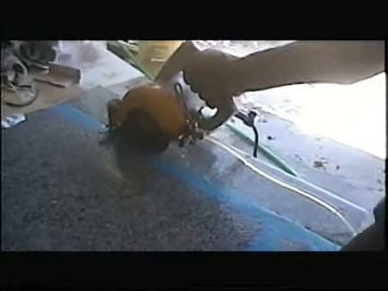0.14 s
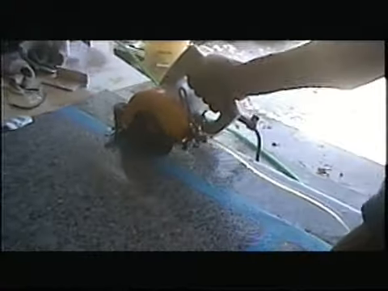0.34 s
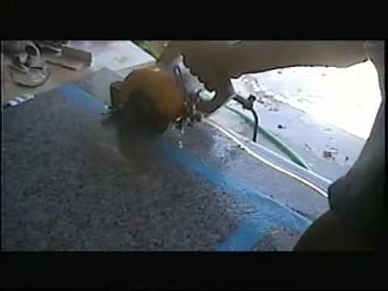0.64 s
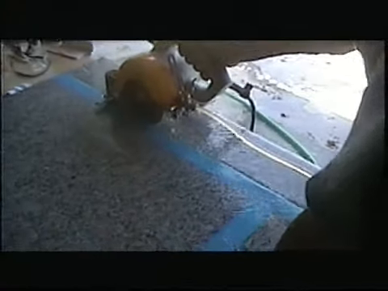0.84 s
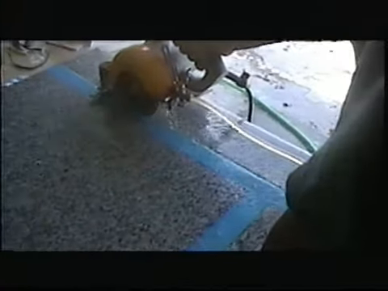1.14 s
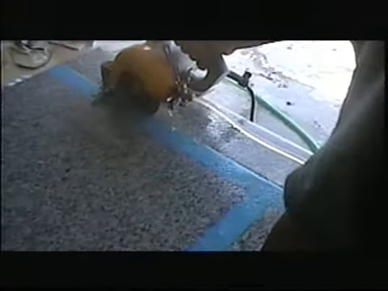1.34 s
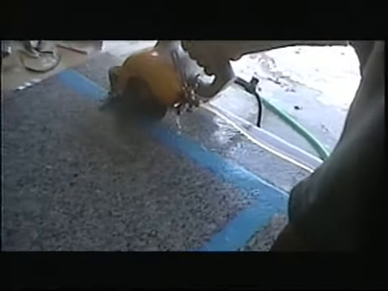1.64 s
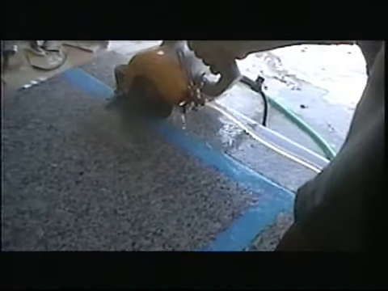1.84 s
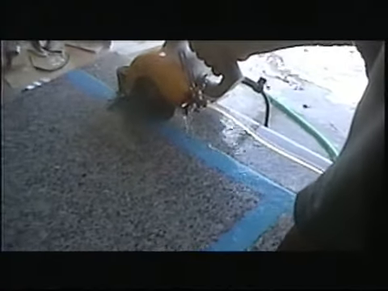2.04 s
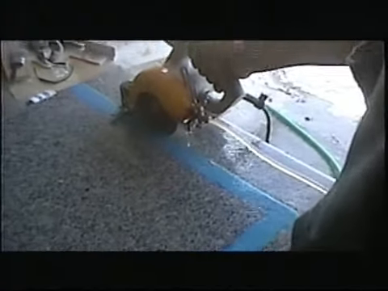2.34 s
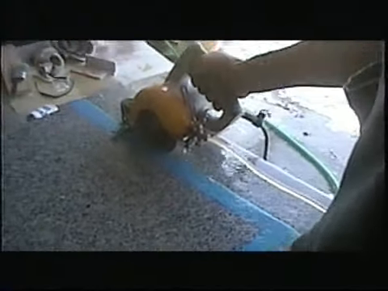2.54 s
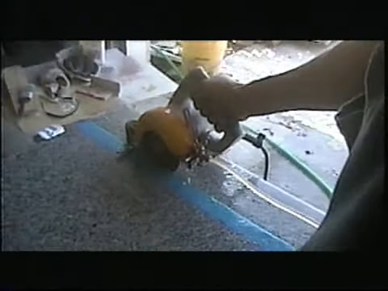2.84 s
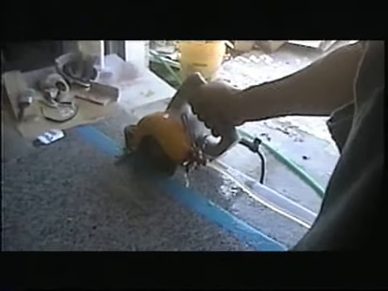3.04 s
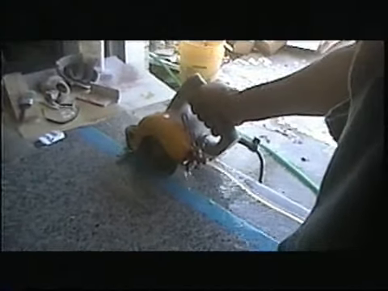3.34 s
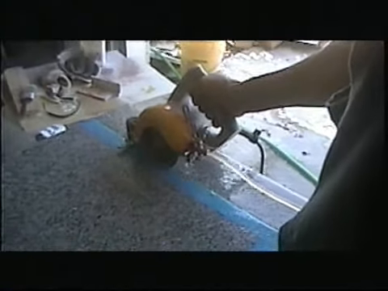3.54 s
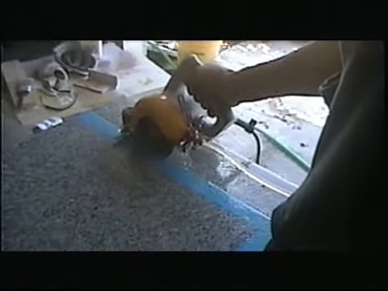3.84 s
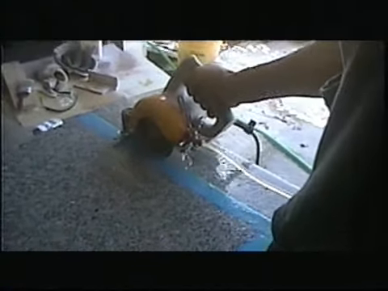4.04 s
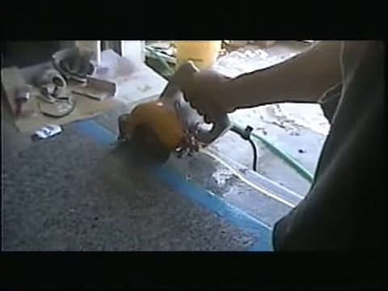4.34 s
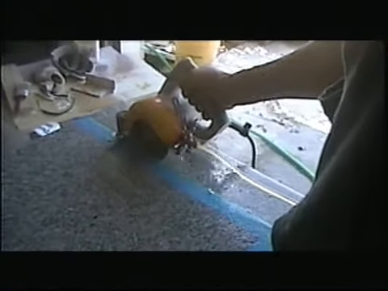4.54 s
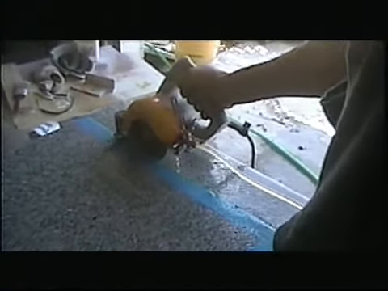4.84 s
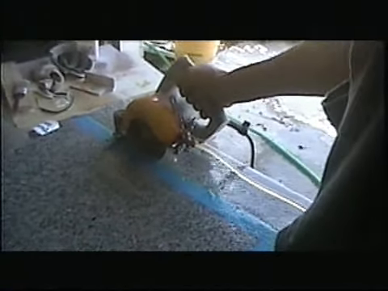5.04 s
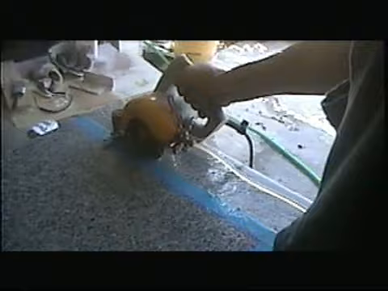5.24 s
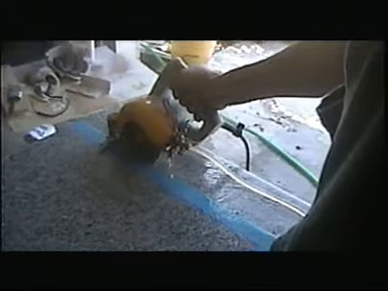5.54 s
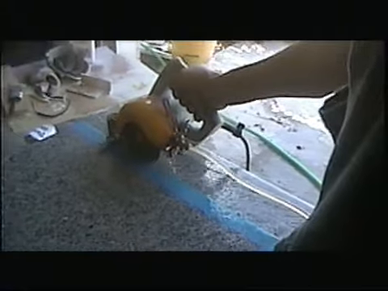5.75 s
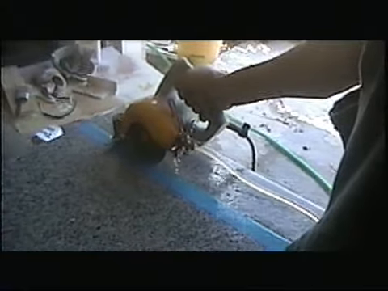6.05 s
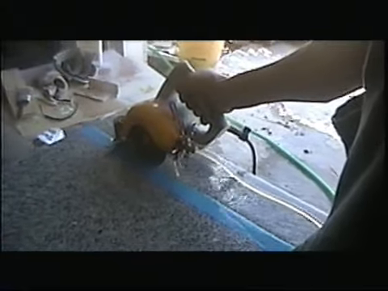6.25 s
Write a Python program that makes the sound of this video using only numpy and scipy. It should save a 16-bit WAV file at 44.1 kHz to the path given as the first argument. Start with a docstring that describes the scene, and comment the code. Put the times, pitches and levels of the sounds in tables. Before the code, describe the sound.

A handheld wet saw is already cutting a stone slab at the start and keeps going for about six and a half seconds, heard almost entirely on the left. The main sound is a bright, buzzing grind with a metallic ring from the steel disc, mixed with the hiss of water and slurry. Beneath it runs a motor and gear whine with a slight rattle. Thin, shrill squeals overlap throughout, swelling and fading at different pitches as the blade binds, and the grinding briefly dips now and then. The pitch rises a little to its peak just after 2 seconds, then sags under load until about 4.3 seconds. After that the saw gradually picks up speed, and from about 5.3 seconds the straining gears sing more strongly. It is still cutting at the end.

```python
"""A handheld wet saw cuts granite for 6.4 seconds, heard on the left. From the start its diamond rim
meets the stone in nearly the same way on every turn, so the grinding buzzes and rings the steel disc.
Water and slurry hiss, the drive whines, and the blade squeals wherever it binds. It spins fastest
just after 2 s, sags under load until about 4.3 s, then picks up again as the gears strain and sing."""
import sys
import numpy as np
from scipy import signal
from scipy.fft import rfft, irfft
from scipy.io import wavfile
from scipy.ndimage import uniform_filter1d, map_coordinates

SR = 44100
rng = np.random.default_rng(int(sys.argv[2]) if len(sys.argv) > 2 else 0)


def unload_audio(sound):
    """Save the sound as a 16-bit wav file, at the path given as the first command line argument."""
    columns = np.transpose(np.atleast_2d(sound))
    # keep every value between -1 and 1, then stretch to whole-number steps
    steps = np.round(np.clip(columns, -1, 1) * 32767)
    wavfile.write(sys.argv[1], SR, steps.astype(np.int16))


N = 282681
T = np.arange(N) / SR
HZ = np.fft.rfftfreq(N, 1 / SR)

# Levels in the tables are relative. A "multiple" is a frequency divided by the blade's turns a second.
# tone colour of the workshop's background: f/Hz, level/dB
ROOM_COLOUR = [(20, -7), (55, 3), (95, -7.5), (130, 2.5), (200, -7), (400, -1.5), (2000, -47)]
# how fast the blade spins: t/s, speed/(turns a second)
BLADE_SPEED = [(0.02, 132.31), (0.15, 132.01), (0.27, 130.73), (0.37, 131.62), (0.42, 131.54),
               (0.75, 135.19), (1.08, 134.3), (1.19, 132.72), (1.34, 133.45), (1.4, 133.15), (1.57, 134.24),
               (1.77, 136.67), (1.9, 139.03), (1.99, 139.48), (2.03, 140.46), (2.22, 140.57),
               (2.42, 138.39), (2.55, 136.12), (2.61, 135.63), (2.68, 133.93), (2.79, 132.97),
               (2.89, 131.38), (3.04, 130.44), (3.32, 126.74), (3.38, 127.01), (3.47, 125.64),
               (3.74, 124.42), (3.83, 123.01), (4.12, 124.01), (4.22, 122.58), (4.39, 122.69),
               (4.71, 126.22), (4.8, 126.17), (4.9, 127.28), (4.95, 126.7), (5.07, 127.88), (5.31, 126.43),
               (5.47, 128.19), (5.53, 127.69), (5.65, 129.0), (5.79, 128.92), (5.96, 129.88), (6.03, 130.9),
               (6.08, 129.95), (6.19, 130.93), (6.39, 130.06)]
# thin tones of the motor shaft: multiple
SHAFT_MULTIPLES = [25.3, 33.72]
# the drive rattles under light load and sings under strain: t/s, rattle factor, strain/dB
DRIVE_LOAD = [(0, 0.49, -3), (.85, 1.7, -1), (1.3, 2.1, -31), (2.1, 3.1, -22), (2.6, 2.5, -3),
              (3, 1.43, -19), (4.2, 0.62, -12), (4.9, 1.05, -10), (5.5, 0.8, 16), (6.41, 0.92, 0)]
# the gear case's own ring: f/Hz, width/Hz, level/dB
CASE_RING = [(930, 105, 0)]
# side tones of the motor's pulsing pull: multiple, pulse rates added to it, level/dB
SIDE_TONES = [(3, -1, -82), (2, 1, -79.5), (8, -1, -83)]
# the four tones of the gears: multiple
GEAR_MULTIPLES = [7, 8, 14, 15]
# how the gears swell under load: t/s, then level/dB of each of the four tones
GEAR_LEVELS = [(0.0, -58, -53.5, -55, -64), (0.29, -51.5, -62, -62, -80), (0.6, -55.5, -64, -57, -75),
               (0.9, -53, -63, -57, -74), (1.23, -59.5, -62, -59, -70), (1.66, -58, -70, -64, -80),
               (1.92, -67, -61, -54.5, -72), (2.11, -67, -72, -80, -82), (2.35, -62, -76, -63, -74),
               (2.65, -58, -65, -53, -76), (2.78, -60, -63.5, -62, -76), (3.1, -54.5, -55, -72, -68.0),
               (3.24, -64, -64, -76, -64), (3.47, -66, -72, -75, -57), (3.87, -71, -62.5, -79, -63),
               (4.28, -76, -54, -84, -56.5), (4.46, -75, -62.5, -70, -62), (4.61, -73, -55.5, -53.5, -61),
               (4.8, -62, -66, -68, -75), (5.24, -63.5, -54.5, -56, -66), (5.42, -70, -56.5, -54.5, -58),
               (5.8, -61, -55.5, -58, -49.5), (5.94, -53.5, -52, -52, -51), (6.08, -50.5, -54, -61, -50.5),
               (6.39, -53, -57.5, -54, -52)]
# pitches that the housing makes louder: f/Hz, width/Hz, level/dB
HOUSING_RINGS = [(255.1, 27.5, -68), (374, 22, -59), (398.5, 4.9, -67), (420.2, 7.5, -61.5),
                 (1342, 28, -65), (1430, 80, -62), (2432, 120, -63)]
# tones of the drive: multiple, level/dB, roughness before the rattle factor, share of the strain
DRIVE_TONES = [(2, 0.4, 0.09, 0.03), (3, -0.5, 0.09, 0.03), (10, 2, 0.17, 0.6), (11, -0.5, 0.25, 0.23),
               (19, -2, 0.76, 0.34)]
# the rim briefly bites harder (+) or loses its grip (-): t/s, length/s, change/dB
BITE_JOLTS = [(0.078, 0.11, -4), (0.18, 0.033, 3), (0.308, 0.049, -4), (0.35, 0.034, -2.5),
              (0.631, 0.019, 6), (0.707, 0.056, 2.5), (1.056, 0.049, -4.5), (1.794, 0.095, 1.5),
              (1.915, 0.025, -9.5), (2.115, 0.15, 2), (2.62, 0.052, -4.5), (2.69, .05, -2),
              (2.838, 0.025, -7), (3.082, 0.033, -9), (3.168, 0.034, -5), (3.205, 0.053, -4.5),
              (3.746, 0.062, 2.5), (4.132, .05, -2.5), (4.23, 0.17, 0), (4.458, 0.09, -3),
              (4.82, 0.053, -3.5), (5.26, 0.071, 3), (5.506, 0.024, -5)]
# narrow pitches at which the disc sings: f/Hz, width/Hz, level/dB
SINGING_RINGS = [(2890, 24, -64), (2880, 86, -69), (3480, 16, -70), (4030, 47, -72), (4470, 380, -68),
                 (5815, 37, -67), (6680, 20, -57), (7550, 40, -55)]
# the blade binds in its slot and squeals: start/s, end/s, multiple, level/dB
BINDS = [(-.1, .62, 34, -57.5), (-.05, .325, 35, -54), (-.1, .4, 30, -58.5), (-.05, .7, 21, -58),
         (-.05, 0.445, 57, -57), (.42, .628, 25, -55), (.42, .7, 44, -62), (.53, .76, 24, -65),
         (.55, .85, 29, -57.5), (.6, .98, 28, -60), (.6, 1.06, 34, -58.5), (.6, .85, 56, -57),
         (1.05, 1.952, 34, -54.5), (1.11, 1.9, 22, -56), (1.95, 2.62, 22, -58), (1.0, 1.8, 30, -58),
         (1.18, 1.52, 64, -58), (1.4, 1.82, 29, -52), (1.63, 2.3, 33, -55.5), (1.66, 1.87, 62, -52.5),
         (1.95, 2.42, 25, -58), (1.98, 2.483, 27, -55), (2.203, 2.43, 26, -56), (2.32, 2.5, 55, -58),
         (2.38, 2.82, 34, -58), (2.42, 2.577, 62, -54.5), (2.7, 3.05, 22, -58), (2.76, 3, 31, -55),
         (2.82, 3.257, 23, -54.5), (2.88, 3.2, 27, -52.5), (3.22, 3.52, 52, -60), (3.27, 3.86, 36, -51),
         (3.27, 3.92, 32, -54.5), (3.25, 3.8, 30, -55.5), (3.6, 4.02, 37, -55), (3.85, 4.2, 36, -56.5),
         (3.872, 4.16, 27, -55), (3.88, 4.417, 24, -57.5), (4.08, 4.65, 37, -56.5), (4.16, 4.506, 23, -57),
         (4.2, 4.48, 33, -56.5), (4.35, 4.75, 53, -59), (4.533, 4.86, 30, -55.5), (4.56, 4.87, 22, -54.5),
         (4.823, 5.142, 30, -51), (5.12, 5.4, 30, -58), (5.5, 6.2, 30, -57.5), (4.883, 5.176, 35, -55),
         (4.88, 5.45, 52, -58.5), (5.0, 5.35, 46, -60.5), (5.13, 5.36, 27, -54.5), (5.2, 5.55, 36, -57),
         (5.322, 5.92, 23, -53.5), (5.5, 5.97, 35, -56), (5.55, 5.85, 58, -60), (5.75, 6.15, 51, -61),
         (5.95, 6.5, 34, -57), (6.0, 6.3, 58, -58), (6.03, 6.5, 50, -58.5), (6.17, 6.55, 45, -59),
         (6.203, 6.55, 35, -57)]
# how much of the grinding repeats from turn to turn: f/Hz, share of the power (0-1)
REPEAT_SHARE = [(500, 0.29), (950, 0.46), (1300, 0.66), (1850, 0.58), (2400, 0.58), (3500, 0.76),
                (4600, 0.75), (6000, 0.52), (8500, 0.8), (12000, 0.8), (15000, 0.1)]
# broad tone colour of rim on stone: f/Hz, level/dB
GRIT_COLOUR = [(190, -27), (310, -12), (450, -10), (550, 0.5), (1250, -8), (2300, 0.5), (3400, 6.5),
               (4200, 1), (5400, -1), (7100, -5.5), (8800, -3.5), (9150, -4), (9600, 1), (10400, 4.5),
               (12500, -2.5), (14600, -12.5)]
# rings (+) of the disc and its guard, and hollows (-) between them: f/Hz, width/Hz, lift/dB
DISC_RINGS = [(1075, 370, 9), (1440, 240, 6.5), (1892, 240, 5), (3290, 41, -3.5), (3956, 980, 7),
              (4340, 110, -6), (4567, 280, 11.5), (5905, 390, 9), (6554, 550, 11.5), (7600, 750, 9),
              (8454, 200, 12.5), (9710, 180, 8), (10780, 300, 2.5), (11400, 250, 3.5), (12400, 230, 7),
              (13100, 250, 6.5)]
# borders between seven bands (roar, grinding, main ring, three high rings, spray): f/Hz
BAND_BORDERS = [2400, 4300, 5200, 7050, 8000, 9100]
# slow course of the cut: t/s, then level/dB of the slab's roar, the grinding, the spray
CUT_LEVELS = [(0.0, -53.5, -50, -51), (0.35, -53.5, -50, -51), (0.5, -52, -48, -49), (0.7, -52.5, -48, -53),
              (1.0, -52.5, -48.5, -52), (1.5, -53, -47, -50.0), (1.8, -54.5, -50, -53),
              (1.9, -54, -47.5, -52.5), (2.35, -51.5, -48, -53.5), (2.65, -53.5, -49, -51),
              (2.8, -53, -46.5, -51.0), (2.9, -54.5, -49.5, -53.5), (3.15, -55, -48, -53),
              (3.3, -53.5, -46, -52), (3.51, -54, -49.5, -52), (3.61, -55.5, -50.5, -53.5),
              (3.81, -55, -49, -51), (4.25, -54.5, -47.5, -50), (4.61, -56.5, -50, -51.5),
              (4.91, -53.5, -47, -50), (5.01, -53, -49, -52), (6.41, -54, -49, -50.5)]
# the disc's main ring near 4.5 kHz: t/s, level/dB
MAIN_RING_LEVELS = [(0, -56), (.19, -47), (.33, -52), (1.0, -52), (1.6, -52.5), (2.35, -54.5), (2.45, -54),
                    (2.7, -52), (2.85, -55), (3.25, -53.5), (3.7, -53.5), (4.2, -52), (4.55, -53),
                    (4.8, -53.5), (4.93, -54), (5.2, -54), (5.29, -51), (5.5, -52), (6.41, -53.5)]
# the disc's high rings: t/s, then level/dB near 6 kHz, 7.6 kHz, 8.5 kHz
HIGH_RING_LEVELS = [(0.0, -58.7, -51.5, -54), (0.69, -54, -56, -52), (1.03, -56.5, -56, -54.5),
                    (1.29, -53, -55.5, -48), (1.77, -56.5, -55.7, -52), (1.93, -56.5, -58.5, -53),
                    (2.23, -54, -59, -52), (2.4, -55, -55, -51), (2.64, -56, -56.5, -53),
                    (2.8, -56.5, -55, -50.5), (3.06, -56, -62, -53.5), (3.44, -57.5, -56, -53),
                    (3.61, -57, -57.7, -55), (4.21, -54, -53.5, -49.5), (4.42, -55, -52.5, -52),
                    (4.88, -53.5, -56.0, -51), (5.18, -54.5, -53, -53), (5.47, -54.5, -55, -53),
                    (5.73, -54, -52.5, -49.5), (6.41, -53.5, -57, -54)]


def amp(db):
    """Turns decibels into a factor to multiply by."""
    return 10 ** (np.asarray(db) / 20)


def unit(x):
    """Scales a signal to an average strength (rms) of one."""
    return x / np.sqrt(np.mean(x ** 2) + 1e-20)


def curves(rows):
    """Joins the points of a table into one curve over time for each column."""
    times, *columns = np.transpose(rows)
    return [np.interp(T, times, column) for column in columns]


def across(points):
    """Reads a table of (f/Hz, value) at every frequency."""
    hz, value = np.transpose(points)
    return np.interp(np.log(HZ + 1), np.log(hz), value)


def resonances(rings):
    """How strongly a ringing part answers at every frequency."""
    return sum(amp(db) / (1 + (2 * (HZ - hz) / width) ** 2) for hz, width, db in rings)


def noise(gains):
    """Noise of strength one, coloured by a gain for every frequency."""
    return unit(irfft(rfft(rng.standard_normal(N)) * gains, N))


def wander(rate_hz, step=64):
    """A smooth random wobble of strength one, mostly slower than the given rate."""
    times = T[::step]
    hz = np.fft.rfftfreq(len(times), step / SR)
    slow = rfft(rng.standard_normal(len(times))) / np.sqrt(1 + (hz / rate_hz) ** 4)
    return np.interp(T, times, unit(irfft(slow, len(times))))


def shaking(rough, rates_hz):
    """The cut shakes a tone: the real part wobbles its level, the imaginary part its timing."""
    wobble = wander(rates_hz[0]) + 1j * wander(rates_hz[1])
    return (1 + rough * wobble) / np.sqrt(.5 + rough ** 2)


def tone(turns, multiple, rough, shake_hz=(17, 30)):
    """A shaken tone of strength one that follows the spinning blade."""
    return (shaking(rough, shake_hz) * np.exp(2j * np.pi * (multiple * turns + rng.random()))).real


def rumble(level_db=-87):
    """The workshop rumbles faintly in the background."""
    return amp(level_db) * noise(amp(across(ROOM_COLOUR)))


def beating(turns, pulse_hz=120):
    """The motor's pull pulses twice a mains cycle, adding faint side tones that beat with the whine."""
    return sum(amp(db) * tone(multiple * turns + side * pulse_hz * T, 0.98, rough=0.055)  # 2 % flat
               for multiple, side, db in SIDE_TONES)


def chatter(rattle, level_db=-72):
    """Loose gear teeth knock the case, which gives a rough ring at its own pitch."""
    return amp(level_db) * rattle * noise(resonances(CASE_RING))


def motor_shaft(turns, level_db=-68):
    """The fast motor shaft adds thin tones between the blade's whole multiples."""
    return amp(level_db) * sum(tone(turns, multiple, rough=0.46) for multiple in SHAFT_MULTIPLES)


def gears(turns, rattle):
    """The gears swell under load and rattle when it is light; the upper two tones flutter most."""
    trims_db, roughness, shakes_hz = (-.8, -1.3, -1.8, -2.3), (.25, .25, .38, .42), (22, 22, 34, 34)
    tones = zip(GEAR_MULTIPLES, curves(GEAR_LEVELS), trims_db, roughness, shakes_hz)
    return sum(amp(db + trim) * tone(turns, multiple, rough * rattle, (hz, 1.2 * hz))
               for multiple, db, trim, rough, hz in tones)


def whine(speed, turns, rattle, strain_db):
    """The drive hums and whines; each tone swells as it glides into a ring of the housing."""
    housing = resonances(HOUSING_RINGS)
    out = np.zeros(N)
    for multiple, db, rough, share in DRIVE_TONES:
        gain = np.interp(multiple * speed, HZ, housing) * amp(db + share * strain_db)
        out += gain * tone(turns, multiple, rough * rattle)
    return out


def bite(unsteady_db=0.27):
    """Quick changes in the force of the cut, in dB: single jolts on top of an unsteady hand."""
    jolts = sum(db * np.cos(np.pi * np.clip((T - middle) / length, -.5, .5)) ** 2
                for middle, length, db in BITE_JOLTS)
    return jolts + unsteady_db * wander(rate_hz=19)


def rim(turns, memory_turns, evenness, points=512, turn_count=920):
    """The bumps around the rim come back on every turn while they slowly wear into new ones."""
    kept = np.exp(-1 / memory_turns)
    fresh = rng.standard_normal((turn_count, points))  # one row for each turn
    worn = signal.lfilter([np.sqrt(1 - kept ** 2)], [1, -kept], fresh, axis=0, zi=kept * fresh[-1:])[0]
    multiples = rfft(worn)
    bumps = irfft(multiples / (abs(multiples) + 1e-9) ** evenness)  # evens out their strengths
    return unit(map_coordinates(bumps.ravel(), [turns * points], order=3, mode="wrap"))


def singing(turns, gain_db=-3, buzz=0.24, points=512):
    """Long-lasting rim bumps make the disc sing whenever a multiple drifts into a narrow ring."""
    bumps = rim(turns, memory_turns=49, evenness=0.71, points=points)
    bumps *= np.sqrt(points / 2)  # each multiple at a strength of about one
    kicks = 1 + buzz * np.cos(2 * np.pi * turns)  # struck anew on every turn
    return amp(gain_db) * kicks * irfft(rfft(bumps) * resonances(SINGING_RINGS), N)


def squeals(turns, rubbing, gain_db=0.5, flatness=2.45, buzz=0.29, window=3500):
    """The blade binds: a squeal takes over one multiple of the rubbing, swells, holds and fades."""
    out = np.zeros(N)
    shake = shaking(rough=0.23, rates_hz=(13, 47))
    for start, end, multiple, db in BINDS:
        now = (T > start) & (T < end)
        arch = np.sin(np.pi * (T[now] - start) / (end - start))
        swell = np.tanh(flatness * arch) / np.tanh(flatness)
        kicks = 1 + buzz * np.cos(2 * np.pi * (turns[now] + rng.random()))  # one throb a turn
        spin = np.exp(2j * np.pi * (multiple * turns[now] + rng.random()))
        squeal = amp(db + gain_db) * kicks * shake[now]
        # the part of the rubbing at this pitch, which the squeal replaces
        replaced = 2 * signal.fftconvolve(rubbing[now] / spin, np.ones(window) / window, "same")
        out[now] += (swell * (squeal - replaced) * spin).real
    return out


def shimmer(x, depth_db, span_s, span_hz, window=1024):
    """Water and stone touch the disc in changing places, so patches of its sound swell and sink."""
    spectra = signal.stft(x, nperseg=window)[2]
    bins = max(2, round(span_hz * window / SR))
    frames = max(2, round(span_s * 2 * SR / window))
    specks = rng.standard_normal(spectra.shape)
    patches = unit(uniform_filter1d(uniform_filter1d(specks, bins, axis=0), frames, axis=1))
    return signal.istft(spectra * amp(depth_db * patches), nperseg=window)[1][:N]


def grinding(turns, bite_db, throb=0.017, flutter_db=0.74, patchy_db=0.53):
    """Repeating rim bumps and freshly broken grains ring the disc; the top band is the spray's hiss."""
    lopsided = 1 + throb * np.cos(2 * np.pi * turns)  # the disc runs slightly out of true
    pressure = lopsided * amp(flutter_db * wander(rate_hz=31))
    bumps = pressure * rim(turns, memory_turns=22.6, evenness=0.69)
    grains = pressure * rng.standard_normal(N)
    share = np.clip(across(REPEAT_SHARE), 0, 1)
    scrape = irfft(np.sqrt(share) * rfft(bumps) + np.sqrt(1 - share) * rfft(grains), N)
    scrape = shimmer(scrape, depth_db=1.08, span_s=.15, span_hz=300)
    disc_db = sum(db / (1 + (2 * (HZ - hz) / width) ** 2) for hz, width, db in DISC_RINGS)
    spectrum = rfft(scrape) * amp(across(GRIT_COLOUR) + disc_db)
    # each band, from low to high, follows its own level and a share of the bite
    band_of = np.searchsorted(BAND_BORDERS, HZ)
    roar, grind, spray = curves(CUT_LEVELS)
    levels_db = [roar, grind, *curves(MAIN_RING_LEVELS), *curves(HIGH_RING_LEVELS), spray]
    trims_db, bite_shares = (-1.2, -1.3, -1, -1, -.7, -.7, 0), (.4, 1, 1, .6, .6, .6, .6)
    out = np.zeros(N)
    for k, level_db in enumerate(levels_db):
        band = unit(irfft(spectrum * (band_of == k), N))
        flicker_db = patchy_db * wander(rate_hz=26)
        out += band * amp(level_db + trims_db[k] + bite_shares[k] * bite_db + flicker_db)
    return out


def scene(tremble=0.000395, slip_turns=0.00093, bite_share=0.62):
    """Drive and blade follow one spindle, whose speed trembles in the cut."""
    speed, bite_db = curves(BLADE_SPEED)[0], bite()
    rattle, strain_db = curves(DRIVE_LOAD)
    turns = np.cumsum(speed * (1 + tremble * wander(rate_hz=13.9))) / SR
    rim_turns = turns + slip_turns * wander(rate_hz=29)  # catching and slipping blurs the high tones
    grip = amp(bite_share * bite_db)  # the ring sinks whenever the rim loses its bite
    rubbing = grinding(rim_turns, bite_db) + grip * singing(rim_turns)
    drive = whine(speed, turns, rattle, strain_db) + gears(turns, rattle)
    drive += motor_shaft(turns) + chatter(rattle) + beating(turns)
    blade = rubbing + grip * squeals(turns, rubbing)
    return (rumble() + drive + blade) * np.ones((2, 1))


def record(dry, left_db=6, right_db=-50, cutoff_hz=15600):
    """One microphone feeds the left channel, the right is almost silent; the top treble is cut."""
    channels = dry * amp([[left_db], [right_db]])
    lowpass = signal.firwin(511, cutoff_hz, window=("kaiser", 9), fs=SR)
    return signal.oaconvolve(channels, lowpass[None], "same")


dry = scene()
out = record(dry)
unload_audio(out)
```